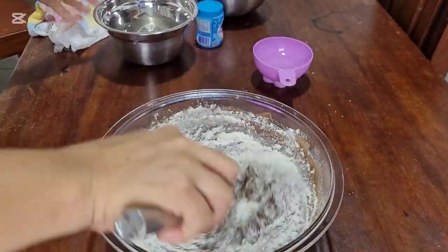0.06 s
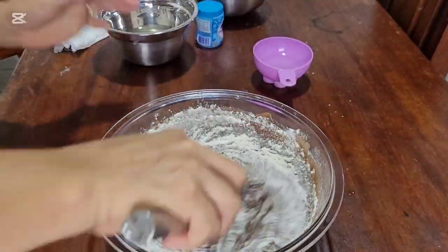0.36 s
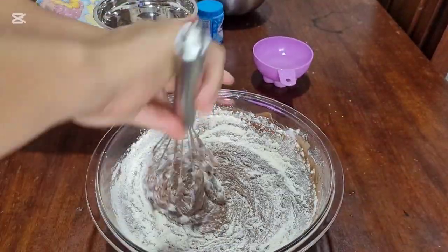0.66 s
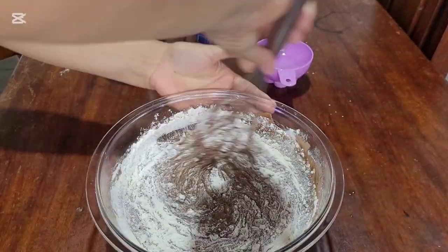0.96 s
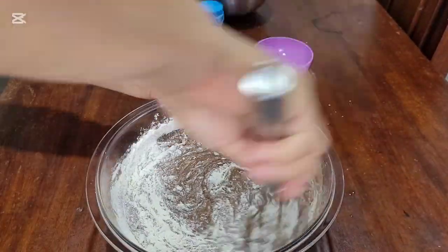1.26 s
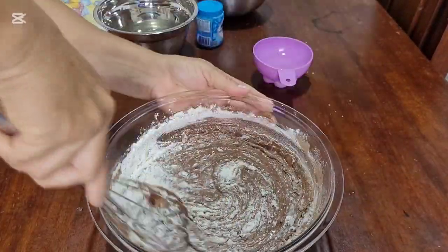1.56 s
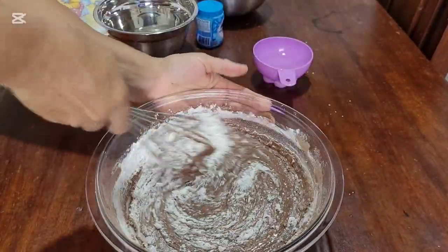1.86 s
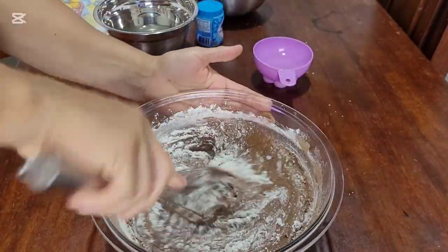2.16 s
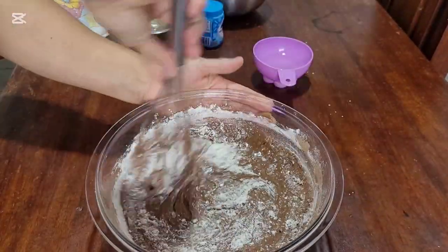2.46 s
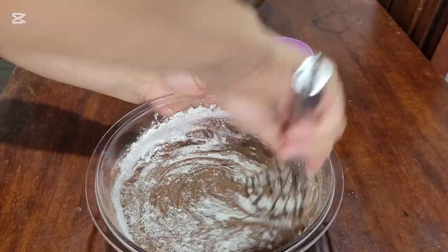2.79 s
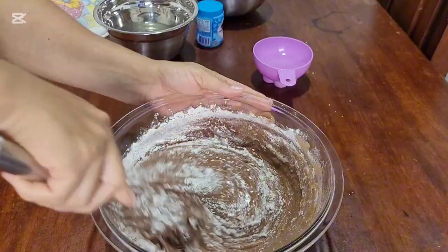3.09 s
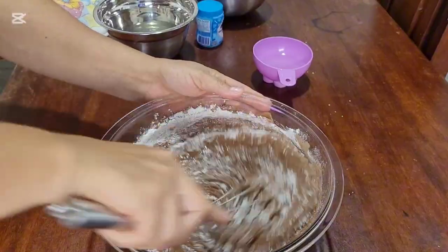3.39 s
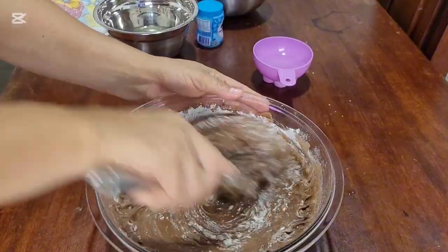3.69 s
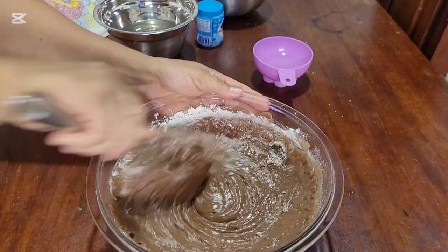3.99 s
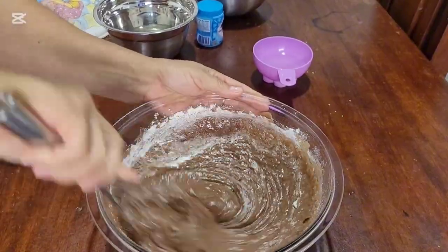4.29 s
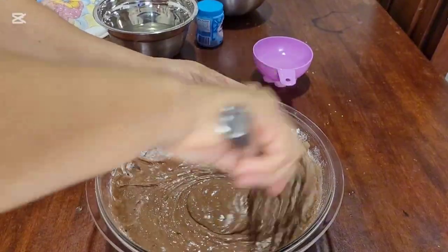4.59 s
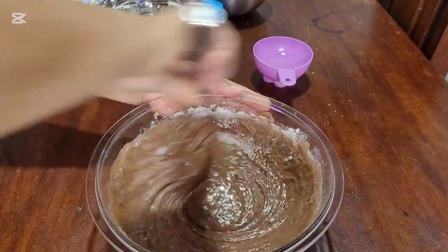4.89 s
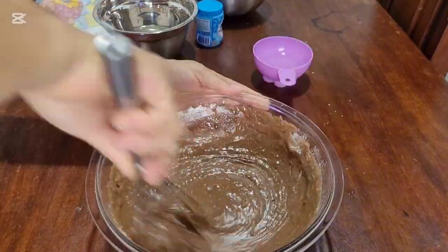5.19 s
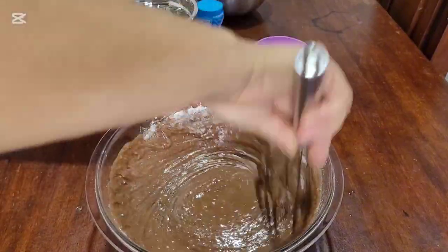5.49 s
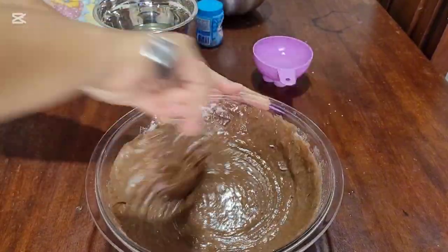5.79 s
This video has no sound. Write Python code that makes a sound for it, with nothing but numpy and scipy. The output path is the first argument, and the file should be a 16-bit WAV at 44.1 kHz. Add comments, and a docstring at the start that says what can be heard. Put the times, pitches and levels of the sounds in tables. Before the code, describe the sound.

After a metallic clang, a whisk stirs wet batter with soft crackles, ticks on glass and one dull wooden thump.

```python
"""A small kitchen, a stereo pair close to a glass bowl on a wooden table; air rushes and an appliance hums.
First a steel bowl is set down with a clang. A wire whisk starts on thick batter, which crackles as it
tears while tiny bubbles burst; from about 1 s the wires rub on the glass and ring it. At 3.4 s comes
one heavy, dull thump of wood. Then the beating is at its busiest: the wires tick on the glass and the
bowl knocks on the table."""
import sys
import numpy as np
from scipy import signal
from scipy.fft import rfft, irfft, next_fast_len
from scipy.io import wavfile
from scipy.ndimage import map_coordinates

SR = 44100
rng = np.random.default_rng(int(sys.argv[2]) if len(sys.argv) > 2 else 0)


def digitize_waveform(pressure):
    """Quantize a signal to 16-bit integers and store it at the path in sys.argv[1].

    Rows of a 2-D input are taken as channels; values are limited to [-1, 1].
    """
    field = np.atleast_2d(pressure).T
    bounded = np.clip(field, -1, 1)
    quanta = np.round(bounded * 32767).astype(np.int16)
    wavfile.write(sys.argv[1], SR, quanta)


N = 257984

# the glass bowl's modes, damped by the batter: (frequency [Hz], width [Hz], level [dB])
GLASS_MODES = [(2170, 50, 1.5), (3320, 60, 2), (3430, 50, 5), (4770, 50, -1.5), (6230, 75, .5),
               (6340, 100, -5), (7040, 80, -10), (7650, 110, -9), (9360, 150, -3), (12700, 130, -14)]
# spectrum of a wire's tick, also of a parting thread of batter: (frequency [Hz], level [dB])
TICK_SPECTRUM = [(150, 0), (600, 2.5), (1200, -11), (2100, -17.5), (2650, -14.5), (3600, -12),
                 (7000, -12.5), (9200, -15.5), (11500, -11.5), (13500, -19), (16000, -33)]


def amp(db):
    """Decibels to gain."""
    return 10 ** (np.asarray(db) / 20)


def unit(x):
    """Scale to rms 1."""
    return x / np.sqrt(np.mean(x ** 2) + 1e-20)


def unit_peak(x):
    """Scale to peak 1."""
    return x / np.abs(x).max()


def unit_energy(x):
    """Scale a short sound to the energy of one millisecond at rms 1."""
    return x / np.sqrt(np.sum(np.atleast_2d(x) ** 2, axis=1).mean() / (SR / 1000))


def along(points, hz):
    """Read (frequency, value) points on a log frequency axis."""
    knots_hz, values = np.transpose(points)
    return np.interp(np.log(hz + 1), np.log(knots_hz + 1), values)


def wobble(rate):
    """A smooth random curve, rate knots a second."""
    return map_coordinates(rng.standard_normal(int(N * rate / SR) + 4), [np.arange(N) * rate / SR])


def swell(start_s, end_s, attack_s, t60):
    """A gain that rises at the start, holds, and dies away after the end."""
    t = np.arange(N) / SR
    return np.clip((t - start_s) / attack_s, 0, 1) * amp(-60 * np.maximum(t - end_s, 0) / t60)


def add(track, s, sound):
    """Mix a sound in at s seconds."""
    part = track[:, max(round(s * SR), 0):][:, :sound.shape[1]]
    part += sound[:, :part.shape[1]]


def filtered(x, response):
    """Pass x through a complex frequency response."""
    size = x.shape[-1]
    padded = next_fast_len(size + SR // 4)
    return irfft(rfft(x, padded) * response(np.fft.rfftfreq(padded, 1 / SR)), padded)[..., :size]


def resonate(x, modes):
    """Pass x through (frequency, width, level) resonances of alternating sign."""
    return filtered(x, lambda hz: sum(
        (-1) ** k * amp(db) * 1j * hz * width / (centre ** 2 - hz ** 2 + 1j * hz * width)
        for k, (centre, width, db) in enumerate(modes)))


def pulse(spectrum, size=4096):
    """The shortest causal pulse with this spectrum, peak 1."""
    cepstrum = irfft(np.log(amp(along(spectrum, np.fft.rfftfreq(size, 1 / SR)))))
    cepstrum[1:size // 2] *= 2
    cepstrum[size // 2 + 1:] = 0
    return unit_peak(irfft(np.exp(rfft(cepstrum))))


def contact(chatter, t60):
    """The force of one touch, then a dying chatter of smaller ones."""
    t = np.arange(SR // 5) / SR
    force = chatter * rng.standard_normal(len(t)) * amp(-60 * t / t60)
    force[0] = 1
    return force


def grains(rate, spread_db, spectrum, alike):
    """Tiny snaps of random size, rms 1; alike is the gain of those that reach both microphones."""
    size = amp(spread_db * np.minimum(rng.exponential(size=(3, N)), 4)) * rng.standard_normal((3, N))
    snaps = size * (rng.random((3, N)) < rate / SR)
    sides = alike * snaps[0] + snaps[1:]
    return unit(filtered(sides, lambda hz: amp(along(spectrum, hz))))


def diffuse(size):
    """White noise from all sides: alike at both microphones in the bass, unrelated in the treble."""
    # likeness of left and right: (frequency [Hz], correlation [ratio])
    likeness = [(100, 0.73), (300, 0.79), (550, 0.58), (1000, 0.039), (2000, 0), (15000, 0.021)]

    def mid_side_gains(hz):
        angle = np.arccos(np.clip(along(likeness, hz), -1, 1)) / 2
        return np.array([np.cos(angle), np.sin(angle)])

    mid, side = filtered(rng.standard_normal((2, size)), mid_side_gains)
    return np.array([mid + side, mid - side])


def in_room(x, room_db):
    """The direct sound at the microphones plus a diffuse tail off the kitchen walls."""
    # the kitchen's reverberation: (frequency [Hz], t60 [s])
    decay_times = [(100, 0.56), (300, 0.4), (800, 0.5), (3500, 0.63), (8000, 0.28), (15000, 0.1)]
    hz, t, noise = signal.stft(diffuse(size=SR * 3 // 4), SR, nperseg=256)
    decay = amp(-60 * t / along(decay_times, hz)[:, None])
    response = signal.istft(noise * decay * (1 - np.exp(-t / 0.00061)), SR, nperseg=256)[1]
    response *= amp(room_db) / np.linalg.norm(response[0])
    response[:, 0] += 1  # the direct path
    return signal.fftconvolve(np.atleast_2d(x), response, axes=1)


def room_tone():
    """Air rushes all round the microphones, and an appliance's motor hums a little unsteadily."""
    # the kitchen's air: (frequency [Hz], level [dB])
    air_spectrum = [(20, -22), (40, -7.5), (80, -7), (140, -3), (200, 1.5), (270, 2), (380, -5),
                    (550, -6.5), (800, -12.5), (1200, -16), (1900, -23), (2600, -37), (6000, -33.5),
                    (16000, -52)]
    # the motor's tones: (frequency [Hz], level [dB])
    hum_tones = [(39.5, -74), (119.5, -62.5), (176.3, -59.5), (186, -66), (240, -67), (367, -73.5),
                 (431, -78.5)]
    t = np.arange(N) / SR
    air = unit(filtered(diffuse(size=N), lambda hz: amp(along(air_spectrum, hz))))
    hum = sum(amp(db + 0.74 * wobble(3.4)) * np.sqrt(2) * np.sin(2 * np.pi * hz * t + 1.5 * wobble(6.1))
              for hz, db in hum_tones)
    return amp(-54 + 0.6 * wobble(5)) * air + hum


def wood_thump():
    """One soft, heavy push on wood, which rings briefly and is carried on by the room."""
    # the blow: (time [s], level [dB])
    s, db = (3.4325, -12)
    # its spectrum: (frequency [Hz], level [dB])
    push_spectrum = [(25, -12), (45, -17), (80, -13), (125, 0), (220, 1), (310, 7.5), (500, 6.5),
                     (750, -1.5), (1050, -5.5), (1400, -15), (2000, -17.5), (2700, -32), (6000, -62),
                     (15000, -83)]
    # the wood's modes: (frequency [Hz], level relative to the blow [dB], t60 [s])
    wood_modes = [(134, -26, 0.22), (262.5, -14, 0.12), (546, -14.5, 0.17)]
    out, t = np.zeros((2, N)), np.arange(SR // 2) / SR
    push = -unit_peak(np.convolve(pulse(push_spectrum), np.hanning(SR // 2000)))
    # the direct sound is muffled; its upper part reaches the microphones by way of the walls
    muffled = filtered(push, lambda hz: 1 / (1 + 1j * hz / 1100) ** 2)
    heard = in_room(push, room_db=1)
    heard[:, :len(push)] += amp(4) * muffled - push
    add(out, s, amp(db) * heard)
    ring = sum(amp(level - 60 * t / t60) * np.sin(2 * np.pi * hz * t) for hz, level, t60 in wood_modes)
    add(out, s, -amp(db) * (ring * (1 - np.exp(-t / 0.004)))[None])
    return out


def steel_bowl():
    """Each blow rings the steel, the bounces on the rim more brightly, and adds a short, dense clatter."""
    # landing and bounces: (time [s], clatter level [dB], ring level [dB], ring tilt [dB/octave])
    blows = [(0.0, -20, -26, 0), (0.019, -23, -47, 2), (0.076, -29.5, -47, 3)]
    # the steel's modes: (frequency [Hz], level [dB], t60 [s])
    steel_modes = [(120, -9, .45), (266, -8, .5), (304, -1, .42), (349, -11, .6), (368, -6, 1.35),
                   (440, -7, .55), (560, -14, .45), (762, -16, .6), (809, -17, .5), (970, -14, .36),
                   (1061, -10, .38), (1094, -11, .45), (1282, -12, .48), (1359, -7, .36), (1391, -15, .45),
                   (1462, -17, .38), (1865, -16, .45), (2009, -7.5, .52), (2197, -13, .4), (2216, -13, .45),
                   (2595, -22, .45), (3291, -12, .4), (3327, -6.5, .4), (3389, -14, .45), (3408, -14, .5),
                   (3472, -11, .42), (3815, -10, .44), (3873, -12.5, .46), (3950, -12, .33),
                   (3987, -10.5, .42), (4016, -9.5, .41), (4312, -16, .3), (4441, -22, .42),
                   (4943, -15, .36), (4983, -18, .42), (5089, -13, .3), (5831, -21, .4)]
    # the clatter: (frequency [Hz], level [dB])
    clatter_spectrum = [(20, -44.5), (42, -6), (80, -15), (125, -11.5), (200, -4), (290, -0.5), (420, -11),
                        (650, -8.5), (1050, -11), (1400, -10.5), (1700, -19.5), (2100, -16.5), (2900, -21),
                        (3400, -16), (4000, -15.5), (4600, -17), (6000, -18.5), (9000, -24.5),
                        (15500, -28.5)]
    # how far out of step a mode reaches the two microphones: (frequency [Hz], phase [rad])
    phase_gap = [(300, .15), (700, 0.34), (1350, 2), (2000, 1.6), (3300, 1.6), (5000, 1.2)]
    out, t = np.zeros((2, N)), np.arange(SR * 3 // 2) / SR
    hz, level, t60 = np.transpose(steel_modes)[:, :, None]
    rocking = amp(3 * np.cos(2 * np.pi * 10.6 * t))  # the ring swells and sinks as the bowl rocks
    side_phase = np.array([[[0.5]], [[-0.5]]]) * along(phase_gap, hz)
    for s, clatter_db, ring_db, tilt in blows:
        clatter = unit_peak(signal.fftconvolve(contact(chatter=0.21, t60=0.086), pulse(clatter_spectrum)))
        add(out, s, amp(clatter_db - 3) * in_room(clatter, room_db=7))
        phase = rng.uniform(0, 2 * np.pi, hz.shape) + side_phase
        ring = amp(level + tilt * np.log2(hz / 1000) - 60 * t / t60) * np.sin(2 * np.pi * hz * t + phase)
        add(out, s, amp(ring_db) * rocking * ring.sum(axis=1))
    return out


def bowl_knocks():
    """Hard strokes rock the glass bowl against the table top: rough judders and round, low thuds."""
    # the bowl knocks: (time [s], level [dB], rise [s])
    knocks = [(.441, -36, 0.014), (.483, -36, 0.0036), (3.155, -43, 0.0043), (3.329, -42.5, 0.0033),
              (3.759, -37, 0.00091), (3.968, -43, 0.0032), (4.125, -42, 0.038), (4.168, -31, 0.00038),
              (4.264, -40.5, 0.00042), (4.453, -41.5, 0.0027), (4.481, -40, 0.0016), (4.566, -36, 0.013),
              (4.714, -46, 0.00067), (4.864, -43, 0.0013), (4.973, -43.5, 0.00091), (5.542, -42.5, 0.0012)]
    # modes of the bowl on the table: (frequency [Hz], width [Hz], level [dB])
    table_modes = [(170, 92, -6), (290, 74, -1), (544, 37, -3), (782, 86, -11), (1220, 220, -22),
                   (2170, 120, -26)]
    # the full bowl presses on the table: (time [s], level [dB], frequency [Hz], rise [s], t60 [s])
    thuds = [(0.473, -50, 63.4, .018, .23), (2.357, -55, 61.8, 0.019, 0.35), (3.323, -51, 77, .018, .23),
             (3.758, -38, 290, 0.01, 0.089), (4.122, -43, 286.6, .02, 0.21),
             (4.165, -38, 295, 0.0019, 0.056), (4.262, -47, 290, 0.0028, 0.063),
             (4.565, -42.5, 300, 0.01, 0.16), (4.713, -43.5, 313, 0.0024, 0.09),
             (4.972, -43.5, 303, .005, 0.044), (4.995, -41, 275, 0.0026, 0.034),
             (5.013, -46.5, 117, .018, 0.26), (5.08, -51.5, 108.5, .018, 0.27)]
    out, t = np.zeros((2, N)), np.arange(SR // 3) / SR
    for s, db, rise_s in knocks:
        # the batter cushions the stroke, so the judder builds up before it dies
        judder = rng.standard_normal(len(t)) * (1 - np.exp(-t / rise_s)) * amp(-60 * t / 0.12)
        # the resonances shift with the spot where the bowl presses
        modes = [(hz * (1 + 0.051 * rng.standard_normal()), width, level)
                 for hz, width, level in table_modes]
        add(out, s - 0.002, amp(db - 3) * in_room(unit_peak(resonate(judder, modes)), room_db=-5))
    for s, db, hz, rise_s, t60 in thuds:
        push = np.sin(2 * np.pi * hz * t) * (1 - np.exp(-t / rise_s)) * amp(-60 * t / t60)
        add(out, s, amp(db) * in_room(unit_peak(push), room_db=-11.5))
    return out


def batter_sucks():
    """Batter sucks at the wires: each gap is a small resonance whose pitch slides as it closes."""
    # the gaps: (time [s], length [s], start pitch [Hz], end pitch [Hz], level [dB])
    gaps = [(2.456, 0.046, 4620, 3660, -72), (3.921, 0.19, 4090, 4380, -70),
            (4.354, 0.069, 4120, 3920, -72), (4.869, 0.14, 3830, 3100, -74), (5.158, 0.11, 3210, 4110, -68)]
    out = np.zeros((2, N))
    for s, length, start_hz, end_hz, db in gaps:
        progress = np.linspace(0, 1, round(length * SR))
        flutter = filtered(rng.standard_normal((2, SR // 4)), lambda hz: np.exp(-(hz / 700) ** 2))
        glide = np.sin(2 * np.pi * np.cumsum(start_hz + (end_hz - start_hz) * progress) / SR)
        suck = np.sin(np.pi * progress) * unit(flutter[:, :len(glide)] * glide)
        add(out, s, amp(db) * in_room(suck, room_db=0))
    return out


def wire_ticks():
    """Wires chatter on the glass close to the microphones, each touch a few uneven jolts."""
    # the touches: (time [s], level [dB], brightness [dB], t60 [s])
    touches = [(.2586, -39, -3, 0.019), (.3693, -37.5, -1, 0.016), (.486, -49, -20, 0.012),
               (.966, -51, -3, 0.015), (1.3257, -44.5, 11, 0.013), (1.514, -45.5, -10, 0.01),
               (1.809, -52, -2, 0.022), (2.4536, -50, -7, .02), (2.638, -38, 0.5, 0.029),
               (3.092, -43.5, 1, 0.032), (3.12, -41, 3, 0.036), (3.156, -44.5, -26, 0.049),
               (3.563, -36, -2, 0.01), (3.593, -33, 1, 0.047), (3.682, -48, 13, .012),
               (3.7585, -38, -1, 0.027), (3.777, -41, -2, .012), (3.802, -47, -3, 0.015),
               (3.826, -40, -0.5, .015), (3.888, -42, 0, 0.055), (3.9655, -38, 6, 0.025),
               (4.022, -48, 11, 0.0094), (4.0615, -41.5, 1, 0.03), (4.142, -38, 0, 0.018),
               (4.167, -40, 8, 0.016), (4.206, -50, 10, .006), (4.2635, -41, 2, 0.021),
               (4.402, -39.5, -0.5, 0.046), (4.448, -40, -6, 0.032), (4.481, -39.5, 3.5, 0.028),
               (4.534, -39, 3, 0.012), (4.565, -36.5, 0.5, 0.05), (4.6385, -40, 14, 0.0058),
               (4.714, -40.5, -4.5, 0.0082), (4.789, -45, 5, 0.033), (4.81, -43.5, -2, .03),
               (4.864, -46, -10, 0.02), (4.937, -45, -4, 0.015), (4.991, -41, -2, 0.017),
               (5.013, -36.5, -6.5, 0.0096), (5.399, -55, 18, .01), (5.429, -44.5, 4, 0.01),
               (5.541, -44.5, -5, 0.017), (5.774, -38.5, 3.5, 0.012), (5.841, -43, 15, .012)]
    # how much of the brightness each band takes: (frequency [Hz], weight [ratio])
    tilt = [(1200, 0.12), (6000, -1.14), (11500, 1)]
    out, t = np.zeros((2, N)), np.arange(SR // 20) / SR
    build_up = 1 - np.exp(-t / 0.00087)
    for s, db, bright_db, t60 in touches:
        # each wire, with its own coat of batter, colours the click differently
        click = pulse([(hz, level + bright_db * along(tilt, hz) + 3.5 * rng.standard_normal())
                       for hz, level in TICK_SPECTRUM])
        jolts = rng.standard_normal((2, len(t))) ** 3 * build_up * amp(-60 * t / t60)
        add(out, s, amp(db - 3) * unit_energy(signal.fftconvolve(jolts, click[None], axes=1)))
    return in_room(out, room_db=-6)[:, :N]


def glass_pings():
    """Harder strikes ring the glass briefly, softened by the batter on the wires."""
    # the strikes: (time [s], level [dB], low-pass corner [Hz], extra level of the lowest mode [dB])
    strikes = [(.847, -59.5, 4000, -6), (.892, -59.5, 5000, -8), (.968, -65, 20000, -8),
               (1.054, -58.5, 4000, -4), (1.195, -58, 3500, -1), (1.327, -57, 6000, -4),
               (1.451, -54.5, 8000, 2), (1.491, -54, 10000, 6), (1.515, -47, 7000, -4),
               (1.569, -56, 4970, 5), (1.648, -54, 16000, -2), (1.674, -47.5, 6500, -6),
               (1.694, -53, 13000, 0), (1.712, -53, 9000, 5), (1.735, -57, 14000, 9),
               (1.872, -55, 5030, 5.5), (3.565, -42, 20000, -1), (3.593, -47, 9000, 6),
               (3.622, -51, 4000, 21), (3.7585, -49.5, 20000, 17), (5.155, -55, 3560, -10)]
    out = np.zeros((2, N))
    for s, db, soft_hz, low_db in strikes:
        # each spot on the wall favours other modes
        modes = [(hz, width, level + low_db * (k == 0) + 1.5 * rng.standard_normal())
                 for k, (hz, width, level) in enumerate(GLASS_MODES)]
        ring = resonate(contact(chatter=0.05, t60=0.025), modes)
        softened = filtered(ring, lambda hz: 1 / (1 + 1j * hz / soft_hz) ** 2)
        add(out, s, amp(db) * unit_energy(softened)[None])
    return in_room(out, room_db=-5)[:, :N]


def wire_rub(effort_db):
    """For about a second the wires stick and slip on the bowl's wall, and every slip pings the glass."""
    slips = grains(rate=1200, spread_db=2.5, spectrum=[(2000, 0.0019), (14000, 0.0085)], alike=0.17)
    on_wall = swell(start_s=0.85, end_s=1.73, attack_s=0.028, t60=0.35)
    level_db = -76 + 0.69 * (effort_db - effort_db.mean()) + 3.4 * wobble(44.4)
    return on_wall * amp(level_db) * unit(resonate(slips, GLASS_MODES))


def bubbles(count, typical_hz=9060, spread_octaves=0.628, t60_cycles=57):
    """Each bursting bubble rings at its own pitch, in its own place between the microphones; rms 1."""
    when, side, lag = rng.random((count, 3)).T[:, :, None]
    hz = np.minimum(typical_hz * 2 ** (spread_octaves * rng.standard_normal((count, 1))), SR / 2)
    size = amp(-6 * np.minimum(rng.exponential(size=(count, 1)), 4))
    age = np.arange(SR // 100)
    cycles = hz * age / SR
    envelope = size * amp(-60 * cycles / t60_cycles) * (1 - np.exp(-cycles / 2))
    left = np.sqrt(side) * np.sin(2 * np.pi * cycles)
    right = np.sqrt(1 - side) * np.sin(2 * np.pi * (cycles + lag))
    at = ((when * N).astype(int) + age).ravel()
    return unit(np.array([np.bincount(at, (envelope * wave).ravel(), N)[:N] for wave in (left, right)]))


def whisk():
    """The wires tear the batter in tiny snaps, burst bubbles and rub the glass, following the arm's effort."""
    # how hard the arm works: (time [s], level [dB])
    effort = [(0.3, -70.5), (0.38, -72.5), (0.53, -75), (0.66, -91), (0.92, -81), (1.09, -78.5),
              (1.26, -75), (1.64, -69), (1.8, -68), (1.95, -90), (2.23, -83.5), (2.51, -87), (2.63, -74.5),
              (2.99, -79), (3.67, -68), (3.93, -72), (5.31, -72.5), (5.85, -72.5)]
    # the whisk digs in: (time [s], level [dB], rise [s], t60 [s])
    digs = [(.42, -67.5, 0.034, 0.28), (.92, -71, 0.041, 0.75), (1.78, -65, 0.0507, 0.8),
            (2.43, -72, 0.075, 1), (3.13, -63.5, 0.042, 0.242), (3.4, -63, 0.038, 0.12),
            (3.64, -79, 0.027, 0.16), (3.94, -65, 0.04, 0.76), (4.159, -54, 0.0085, 0.094),
            (4.43, -63, 0.045, 0.62), (4.77, -76.5, 0.032, 0.11), (4.85, -67.5, 0.037, 0.61),
            (5.52, -69.5, 0.028, 0.42), (5.81, -63, .025, .4)]
    # the batter's wet squelch: (frequency [Hz], level [dB])
    squelch_spectrum = [(300, -7), (800, -7), (1200, 7), (1700, -7), (2100, -3.5), (2600, -11.5),
                        (3200, -5), (4200, -5.5), (6000, -9.5), (9000, -9), (16000, -6.5)]
    # its fine crackle: (frequency [Hz], level [dB])
    crackle_spectrum = [(1000, 13.5), (4000, 0), (6500, 6), (8000, 9.5), (9300, 1), (11400, 14),
                        (13500, -1), (16000, -2.5)]
    effort_db = np.interp(np.arange(N) / SR, *np.transpose(effort))
    digging = sum(amp(db) * swell(s, s + rise, rise, t60) for s, db, rise, t60 in digs)
    drive_db = 20 * np.log10(np.hypot(amp(effort_db), digging))
    clumps = wobble(70)  # the wires pass through one after another, so the snaps come in clumps
    squelch = grains(rate=1700, spread_db=0, spectrum=squelch_spectrum, alike=0.29)
    squelch *= amp(-69.5 + drive_db - drive_db.mean() + 3.1 * clumps)
    crackle = grains(rate=2400, spread_db=0.5, spectrum=crackle_spectrum, alike=0.087)
    crackle *= amp(drive_db - 0.5 + 3 * clumps)
    fizz = amp(drive_db - 4.5) * bubbles(count=1400)
    # now and then a thread of batter parts with a single louder snap
    snaps = amp(drive_db - 2) * grains(rate=60, spread_db=0.5, spectrum=TICK_SPECTRUM, alike=0.3)
    return in_room(squelch + crackle + fizz + snaps + wire_rub(effort_db), room_db=-5.5)[:, :N]


def scene():
    """The steel bowl's top treble favours the left microphone; the rest sits a little to the right."""
    beating = whisk() + batter_sucks() + wire_ticks() + glass_pings() + bowl_knocks()
    lean_left = lambda hz: amp(along([(9000, 0), (15000, 3.5)], hz) * np.array([[1], [-1]]))
    clang = filtered(steel_bowl(), lean_left)
    return clang + (beating + wood_thump() + room_tone()) * amp([[-0.35], [0.35]])


def record(dry):
    """The recorder cuts off steeply at its band limit."""
    top_hz = 15800
    return filtered(dry, lambda hz: 1 / (1 + (hz / top_hz) ** 300))


dry = scene()
out = record(dry)
digitize_waveform(out)
```